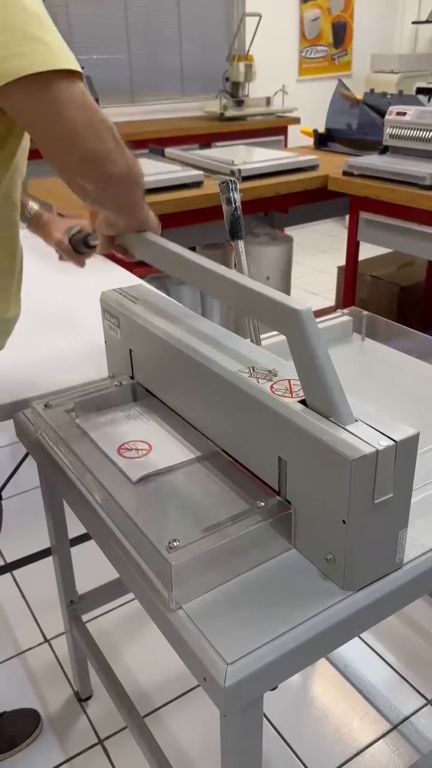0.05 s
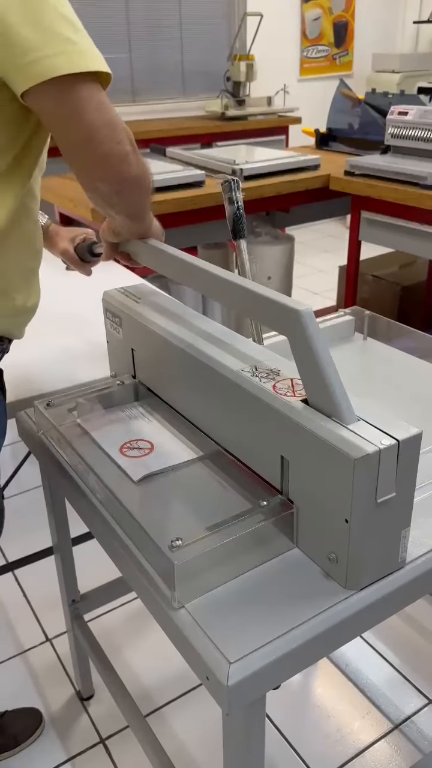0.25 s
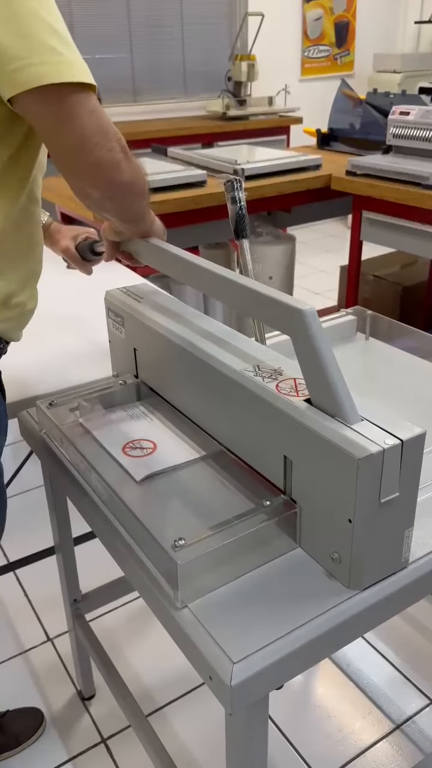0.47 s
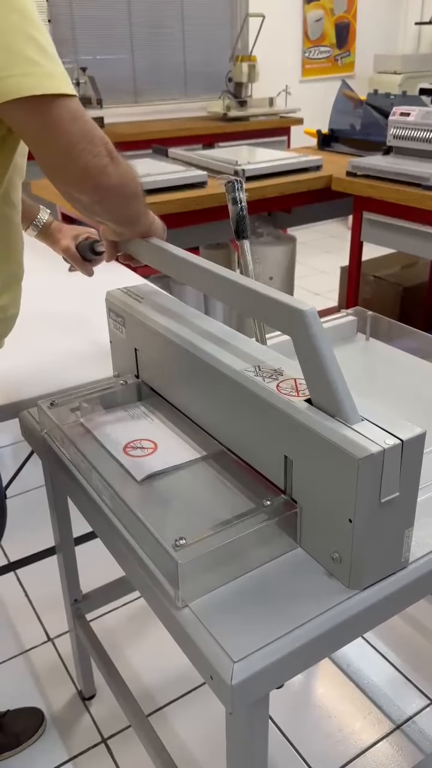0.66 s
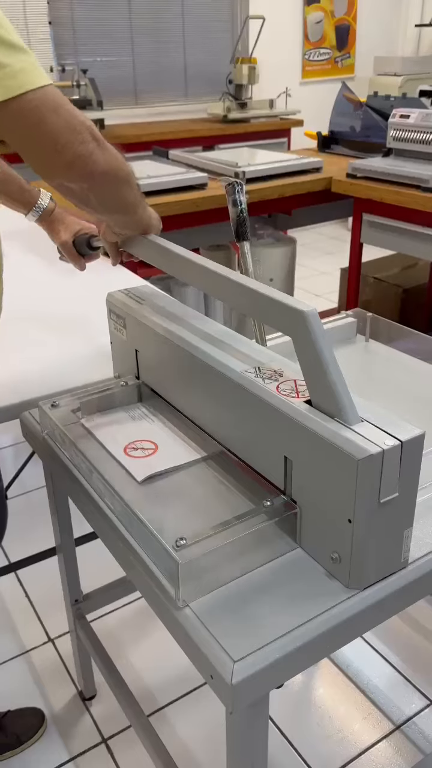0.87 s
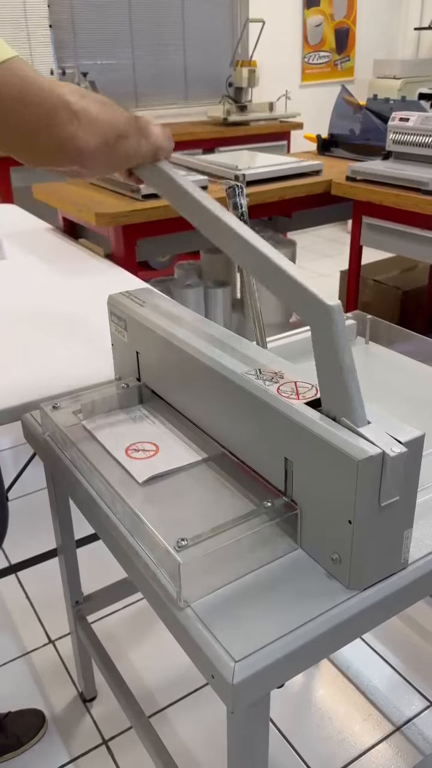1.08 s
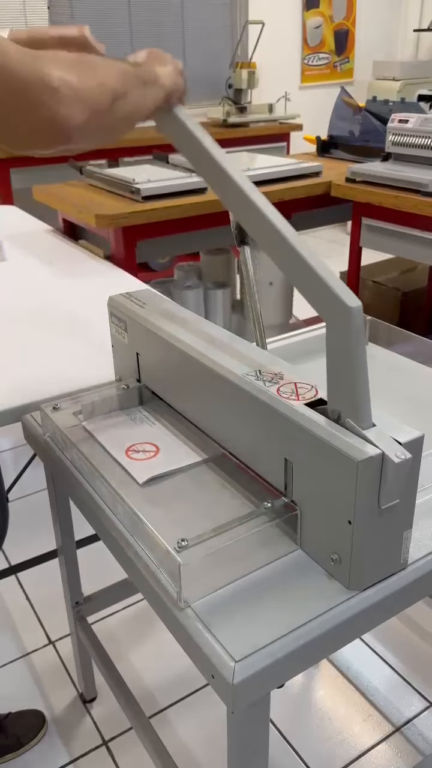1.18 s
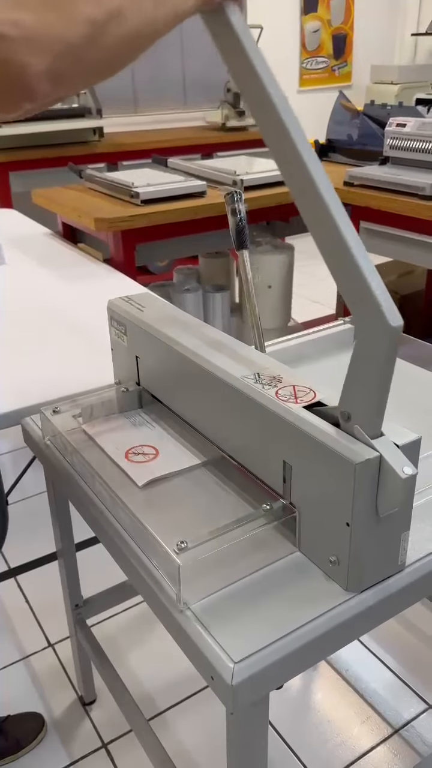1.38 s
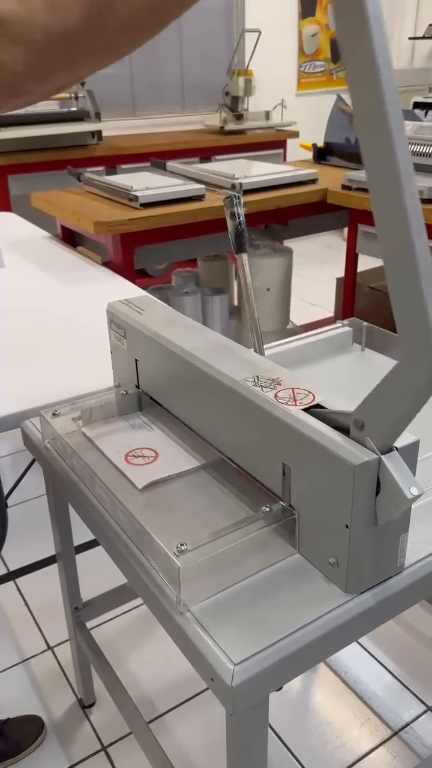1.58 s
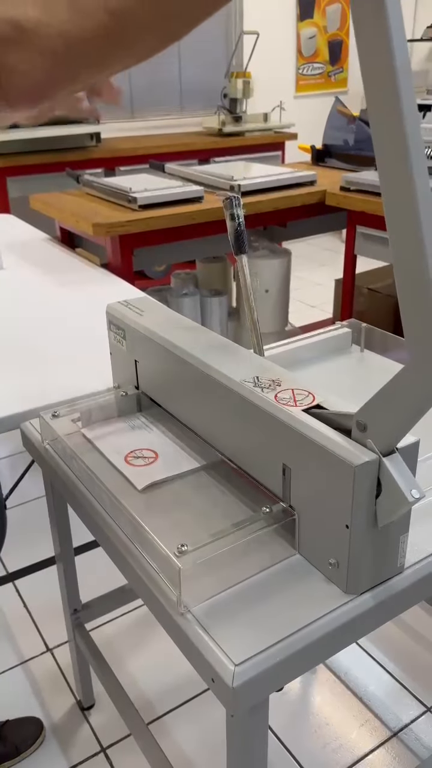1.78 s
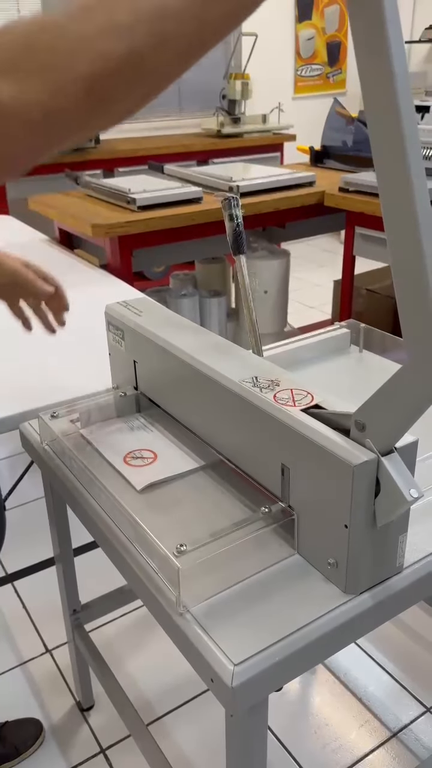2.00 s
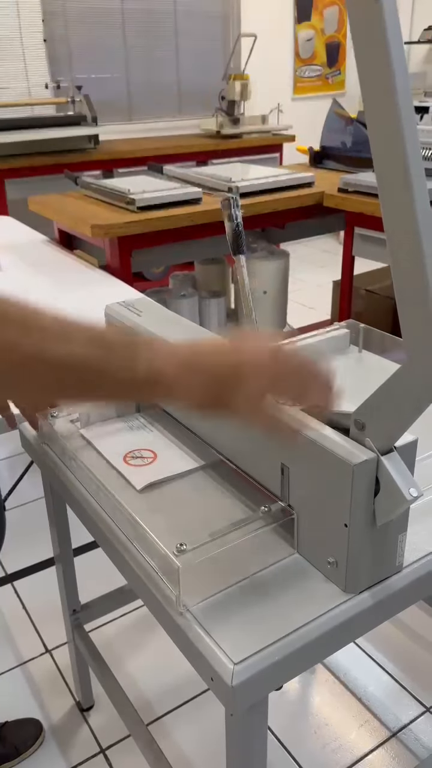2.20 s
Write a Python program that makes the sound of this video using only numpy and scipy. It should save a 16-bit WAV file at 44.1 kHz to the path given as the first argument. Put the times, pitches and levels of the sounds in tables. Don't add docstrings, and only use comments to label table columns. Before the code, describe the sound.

A hand-lever paper cutter shears a stack with a crunch and heavy metal clatter, rings briefly, then knocks loose, groans upward and latches with a rattling clank; close phone pickup in a live tiled shop.

```python
import sys
import numpy as np
from scipy import signal
from scipy.fft import rfft, irfft
from scipy.io import wavfile
from scipy.ndimage import uniform_filter1d

SR = 44100
rng = np.random.default_rng(int(sys.argv[2]) if len(sys.argv) > 2 else 0)


def ratio_of_db(decibels):
    return 10 ** (np.asarray(decibels, float) / 20)


def wav_record(signal):
    frames = np.transpose(np.atleast_2d(signal))
    bounded = np.clip(frames, -1, 1)
    quanta = np.round(bounded * 32767).astype(np.int16)
    wavfile.write(sys.argv[1], SR, quanta)


N = 99225
T = np.arange(N) / SR

# (frequency [Hz], level [dB per Hz])
THUD_COLOUR = [(47, -50.5), (80, -23), (270, -14), (345, -20), (385, -16.5), (510, -21), (694, -22),
               (2040, -28.5), (4000, -41.5), (5200, -68.5), (8800, -120)]


def unit(x):
    return x / np.sqrt(np.sum(x ** 2))


def logf(hz, table):
    a = np.array(table, float)
    return np.interp(np.log(np.maximum(hz, 1)), np.log(a[:, 0]), a[:, 1], left=a[0, 1], right=a[-1, 1])


def noise(colour):
    hz = np.fft.rfftfreq(N, 1 / SR)
    inside = (hz > colour[0][0] / 2) & (hz < colour[-1][0])
    spectrum = rfft(rng.standard_normal(N)) * ratio_of_db(logf(hz, colour)) * inside
    return unit(irfft(spectrum, N)) * np.sqrt(N)


def decay(t60):
    return np.exp(-np.log(1000) * T / t60)


def struck(s, t60, rise):
    late = np.maximum(T - s, 0)
    return (1 - np.exp(-late / rise)) * np.exp(-np.log(1000) * late / t60)


def curve(table):
    a = np.array(table, float)
    return ratio_of_db(np.interp(T, a[:, 0], a[:, 1], left=-120, right=-120))


def ring(modes):
    total = 0
    for hz, db, t60 in modes:
        phase = 2 * np.pi * rng.random()
        total = total + ratio_of_db(db) * np.sin(2 * np.pi * hz * T + phase) * decay(t60)
    return unit(total)


def conv(x, h):
    return signal.fftconvolve(x, h)[:N]


def band(x, hz, q):
    return unit(signal.lfilter(*signal.iirpeak(hz, q, fs=SR), x)) * np.sqrt(N)


def grains(rate, spread_db):
    u = rng.random((3, N))
    size = ratio_of_db(-spread_db * np.log(1 - u[1]))
    return unit((u[0] < rate / SR) * size * np.sign(u[2] - .5)) * np.sqrt(N)


def floor():
    # (frequency [Hz], level [dB per Hz])
    middle_colour = [(15, -45), (25, -23.5), (59, -12), (183, -21.5), (340, -21.5), (600, -37.5),
                     (665, -33), (3380, -44), (12000, -70.5), (15600, -95.5), (22000, -120)]
    # (frequency [Hz], level [dB per Hz])
    wide_colour = [(15, -39.5), (25, -23), (65, -16), (419, -13.5), (453, -3), (1410, -16.5), (1780, -54),
                   (2140, -15), (12100, -45), (15700, -76), (22000, -120)]
    return ratio_of_db(-59) * noise(middle_colour), ratio_of_db(-65.5) * noise(wide_colour)


def tail(colour):
    # (frequency [Hz], t60 [s])
    shop_t60 = [(100, 0.51), (400, 0.6), (1000, 0.45), (2500, 0.73), (6000, 0.7), (11000, 0.75)]
    spectrum, hz = rfft(noise(colour)), np.fft.rfftfreq(N, 1 / SR)
    half_octave = np.round(2 * np.log2(np.maximum(hz, 20) / 20))
    out = 0
    for b in range(20):
        t60 = logf(20 * 2 ** (b / 2), shop_t60)
        out = out + irfft(spectrum * (half_octave == b), N) * decay(t60)
    return unit(out * (1 - np.exp(-T / 0.004)))


def wide_shop():
    # (frequency [Hz], level [dB per Hz])
    wide_colour = [(59, -44.5), (100, -34.5), (633, -4), (715, 2.5), (1390, -28), (1950, -26.5),
                   (2480, 6.5), (6500, -5.5), (9000, -7.5), (10500, -8.5), (12100, -13), (15700, -82),
                   (22000, -120)]
    return tail(wide_colour) + ratio_of_db(-2) * unit(noise(wide_colour) * decay(0.09))


def stand():
    # (time [s], level [dB])
    jolts = [(0.102, -62), (0.158, -41), (0.259, -38), (0.552, -47), (.72, -48), (0.991, -42), (1.17, -46),
             (1.299, -51), (1.419, -51), (1.699, -28.5), (1.77, -45), (1.861, -33), (1.928, -36.5),
             (2.0, -41), (2.16, -37)]
    # (frequency [Hz], level [dB], t60 [s])
    stand_modes = [(30, -25, 0.23), (51.5, -10.5, 0.53), (56.9, -9, 1), (64.5, 1, 0.16), (78, 1, 0.2),
                   (122.7, -4, 0.29)]
    sway = sum(ratio_of_db(db + 3) * struck(s, 0.34, 0.013) for s, db in jolts)
    return conv(rng.standard_normal(N) * sway, ring(stand_modes))


def slide():
    # (time [s], friction [dB])
    friction = [
        (1.08, -74),
        (1.15, -45.5),
        (1.19, -48.5),
        (1.3, -48.5),
        (1.39, -55),
        (1.41, -52),
        (1.57, -37.5),
        (1.6, -45.5),
        (1.67, -36.5),
    ]
    # (time [s], rasp [dB])
    rasp_curve = [
        (1.42, -44),
        (1.48, -51.5),
        (1.675, -44),
    ]
    # (frequency [Hz], level [dB per Hz])
    rasp_colour = [(410, -2), (700, 2.5), (1340, -11.5), (1450, -13.5), (1770, -0.5), (4740, -40.5),
                   (9000, -29), (11700, -76), (19800, -120)]
    # (frequency [Hz], level [dB], t60 [s])
    lever_modes = [(358, -1, .08), (385, 0, .1), (415, -2, .06), (490, -4, .05), (615, -6, .05),
                   (818, -13, .1)]
    judder_s, judder_db = 0.04, 2.5
    stick_slip_hz, wander_hz = 376, 9

    k = int(SR * judder_s)
    steps = np.repeat(rng.standard_normal(N // k + 1), k)[:N]
    judder = ratio_of_db(judder_db * uniform_filter1d(steps, k // 2))
    drag = curve(friction) * judder
    rub = drag * grains(670, spread_db=-1.0)
    rasp = conv(curve(rasp_curve) * grains(1800, spread_db=-1.0), unit(noise(rasp_colour) * decay(0.098)))
    hz = stick_slip_hz + wander_hz * np.log(judder) * 3
    lock = ratio_of_db(-3) * drag * np.sin(2 * np.pi * np.cumsum(hz) / SR)
    return rub, lock + ratio_of_db(1.5) * conv(rub, ring(lever_modes)) + ratio_of_db(-3) * rasp


def cover_rings():
    # (frequency [Hz], level [dB], t60 [s])
    cover_modes = [(390, 0, 1.1), (560, -9, 1.1), (673, -12, 1.9), (826, 0, 1.1)]
    # (time [s], level [dB])
    cover_hits = [
        (.15, -5),
        (1.77, -10),
    ]
    cover = ring(cover_modes)
    return sum(ratio_of_db(db) * np.pad(cover, (int(s * SR), 0))[:N] for s, db in cover_hits)


def pings():
    # (time [s], level [dB], frequency [Hz], t60 [s])
    single_rings = [(.062, -26, 402, 0.11), (.095, -15.5, 372.1, 0.31), (.113, -10.5, 356, 0.035),
                    (.146, -12.5, 2025, 0.051), (.146, -6.5, 932, 0.024), (0.147, -13, 1285, 0.055),
                    (.156, -10, 336, 0.059), (.156, -9, 688, 0.055), (.907, -38, 1550, .025),
                    (.907, -53, 1354, 0.019), (.95, -24.5, 1040, .03), (.955, -21, 198, .13),
                    (1.032, -26, 394, 0.086), (1.72, -20, 287, 0.12), (.1, -22.5, 268, .15),
                    (.955, -37.5, 128.4, 0.3), (.954, -35, 750, 0.019), (0.974, -16.5, 387, 0.052),
                    (1.695, -32, 101, 0.32), (1.72, -21, 185, 0.042), (1.72, -11.5, 660, 0.039),
                    (1.765, -17, 682, 0.028), (0.239, -37, 60.5, 1.7), (0.157, -19, 252, 0.057),
                    (1.257, -44, 630, 0.056), (1.695, -14, 553, 0.1), (1.71, -10.5, 370, 0.12),
                    (1.73, -15, 1920, 0.026), (1.761, -11.5, 198, 0.059), (1.856, -20, 119, 0.2),
                    (1.92, -19.5, 179, 0.073), (1.964, -25, 160, .08), (2.013, -25.5, 163, 0.061),
                    (2.07, -34.5, 124.9, 0.35)]
    total = 0
    for s, db, hz, t60 in single_rings:
        rise = 0.45 / hz
        total = total + ratio_of_db(db) * struck(s, t60, rise) * np.sin(2 * np.pi * hz * (T - s))
    return total


def cracks():
    # (time [s], level [dB], centre [Hz])
    snaps = [
        (0.149, -13.5, 1460),
        (0.148, -34.5, 6300),
        (.932, -45, 6000),
        (1.408, -40.5, 2270),
        (.952, -29, 1410),
        (1.706, -20, 4830),
        (1.762, -12.5, 6800),
    ]
    grit = grains(14000, spread_db=3.5)
    return sum(ratio_of_db(db) * struck(s, 0.02, 0.0012) * band(band(grit, hz, 1.0), hz, 1.0) for s, db, hz in snaps)


def housing():
    # (frequency [Hz], level [dB], t60 [s])
    panel_modes = [(130.7, -5, 0.091), (196.6, 6.5, 0.11), (278, 9, 0.05), (322, -1.5, 0.067),
                   (387.3, 0, 0.1), (477, 4.5, 0.052), (606.5, 5, 0.086), (661, 4.5, 0.052),
                   (774, -6.5, 0.4), (979, -2.5, 0.2), (1340, -11, 0.041)]
    body = unit(noise(THUD_COLOUR) * decay(0.11)) + ring(panel_modes)
    return unit(body + ratio_of_db(-2) * tail(THUD_COLOUR))


def steel_parts():
    # (frequency [Hz], level [dB per Hz])
    click_colour = [(410, -2), (700, -7.5), (1130, -10.5), (1360, -6.5), (2850, -7), (3090, -9.5),
                    (6020, -11), (9460, -21.5), (12000, -90), (15600, -116), (22000, -120)]
    # (frequency [Hz], level [dB], t60 [s])
    steel_modes = [(1610, 9, 0.025), (2065, 4.5, 0.028), (2491, -1, 0.21), (4235, -7, 0.15),
                   (4330, -18.5, 0.09), (4680, -19.5, 0.067), (5830, -14.5, 0.11), (8950, -31, 0.073)]
    shop = tail(click_colour)
    tick = unit(noise(click_colour) * decay(0.014))
    return unit(tick + ratio_of_db(-8.5) * ring(steel_modes) + ratio_of_db(-2.5) * shop), shop


def contacts():
    # (time [s], force [dB])
    shear = [
        (0.0, -41.5),
        (.06, -32),
        (0.122, -15),
        (0.138, -16),
    ]
    # (time [s], thud [dB], click [dB], chatter t60 [s], thud centre [Hz])
    blows = [(0.092, -33, -25, 0.057, 354), (0.108, -6.5, -46.5, 0.068, 417), (.144, -7, -13, 0.078, 520),
             (0.168, -9.5, -29, 0.1, 398), (0.255, -31.5, -33.5, 0.18, 462), (0.905, -48, -51.5, 0.15, 886),
             (0.93, -21, -32.5, 0.093, 1190), (0.951, -19.5, -40, 0.12, 287), (0.96, -18, -43, 0.062, 890),
             (1.029, -38, -74.5, 0.19, 350), (1.408, -31, -55, 0.15, 490), (1.68, -10, -25.5, 0.2, 780),
             (1.703, -11.5, -14, 0.1, 561), (1.719, -17, -27, 0.18, 426), (1.764, -13.5, -12.5, 0.11, 453),
             (1.8, -20.5, -36, 0.1, 509), (1.839, -15.5, -26, 0.11, 300), (1.87, -24, -21, 0.095, 300),
             (1.92, -21, -55.5, 0.041, 171), (2.014, -34, -58.5, 0.026, 163)]
    thud_rise_s, click_rise_s = 0.00091, 0.0027
    knock_db = 7

    heavy, light = grains(2500, spread_db=1.5), grains(7000, spread_db=0.0)
    cut = curve(shear)
    thud = ratio_of_db(-2) * cut * rng.standard_normal(N)
    click = ratio_of_db(-14) * cut * rng.standard_normal(N)
    for s, thud_db, click_db, t60, hz in blows:
        thud = thud + ratio_of_db(thud_db - 15) * struck(s, t60, thud_rise_s) * band(heavy, hz, 0.54)
        click = click + ratio_of_db(click_db) * struck(s, t60, click_rise_s) * light
        click[int(s * SR) + 20] += ratio_of_db(click_db + knock_db)
    return thud, click


def scene():
    floor_mid, floor_side = floor()
    sway = stand()
    rub, groan = slide()
    ping = pings() + cracks()
    thud, click = contacts()
    steel, shop = steel_parts()

    mid = conv(thud + ratio_of_db(-7) * rub, housing()) + conv(click, steel)
    mid = mid + groan + sway + cover_rings()
    mid = mid + ping + ratio_of_db(-16.5) * conv(ping, shop) + floor_mid
    body = signal.sosfilt(signal.butter(2, [170, 750], "band", fs=SR, output="sos"), mid)
    mid = signal.sosfilt(signal.butter(6, 10580, fs=SR, output="sos"), mid)

    side = ratio_of_db(-7.5) * conv(click + ratio_of_db(-23) * rub, wide_shop())
    side = side + ratio_of_db(-39) * conv(thud + ratio_of_db(-10.5) * ping, tail(THUD_COLOUR))
    side = side + ratio_of_db(-28) * body + ratio_of_db(-29) * np.roll(sway, 300) + floor_side
    return np.array([mid + side, mid - side])


def mute(x, spared_per_db, column):
    # (frequency [Hz], mid threshold [sigma], side threshold [sigma])
    muting = [(300, -5, -2.5), (1600, -2, 0.9), (2600, -2.5, -1.4), (6430, -2, -1.1), (7700, -0.5, -1),
              (11110, 2.1, -.9), (11390, 18, 1.5)]
    hz, _, z = signal.stft(x, SR, nperseg=1024, noverlap=768)
    which = np.sqrt(hz / 6).astype(int)
    luck = uniform_filter1d(rng.standard_normal((which[-1] + 1, z.shape[1])), size=9, axis=1) * 3
    treble = np.abs(z[100:]).mean(axis=0)
    level = 10 * np.log10(uniform_filter1d(treble ** 2, size=3) + 1e-14)
    rise = np.maximum(level - np.roll(level, 4), 0)
    threshold = logf(hz, [(row[0], row[column]) for row in muting])[:, None]
    keep = np.clip(3 * (luck[which] + spared_per_db * rise - threshold), 0, 1)
    return signal.istft(z * keep, SR, nperseg=1024, noverlap=768)[1][:N]


def top_cut(x):
    return signal.sosfilt(signal.butter(12, 12250, fs=SR, output="sos"), x)


def record(dry):
    x = signal.sosfilt(signal.ellip(8, .2, 70, 12250, fs=SR, output="sos"), np.tanh(dry))
    mid = mute((x[0] + x[1]) / 2, 1.97, column=1)
    side = mute((x[0] - x[1]) / 2, 0.01, column=2)
    return top_cut(np.array([mid + side, mid - side]))


dry = scene()
out = record(dry)
wav_record(out)
```